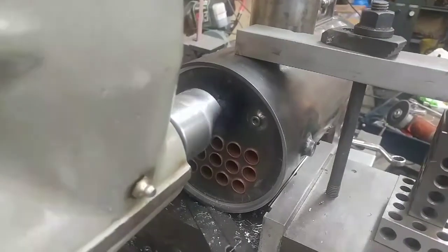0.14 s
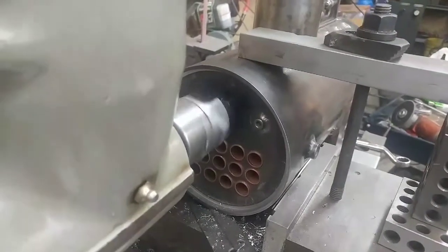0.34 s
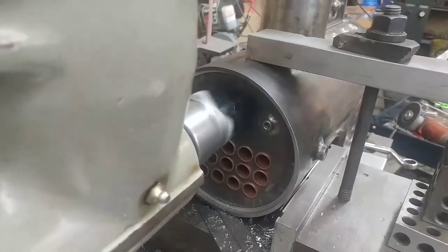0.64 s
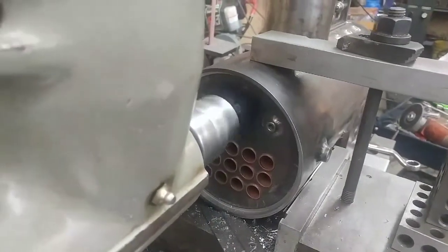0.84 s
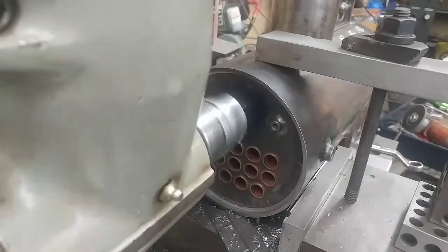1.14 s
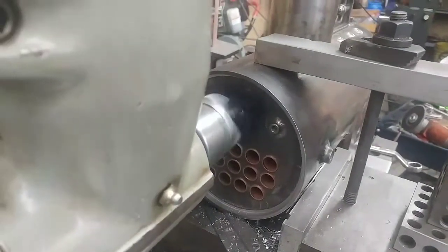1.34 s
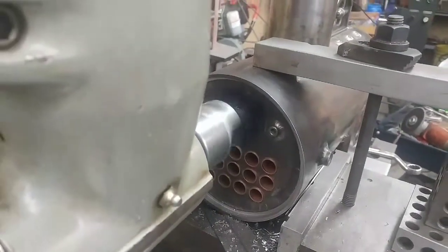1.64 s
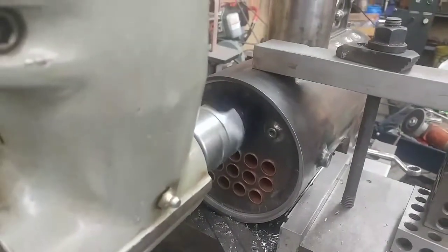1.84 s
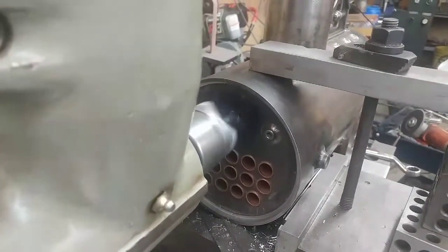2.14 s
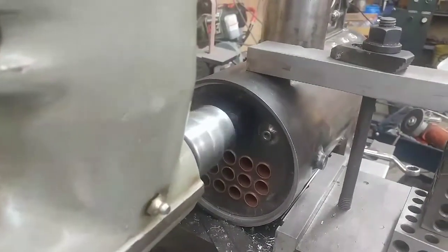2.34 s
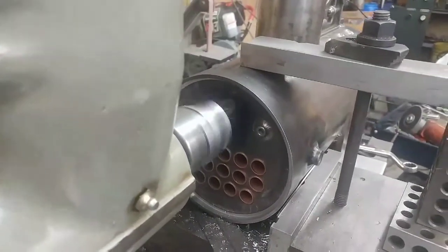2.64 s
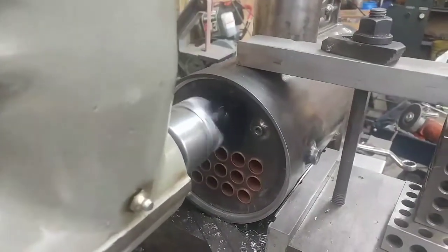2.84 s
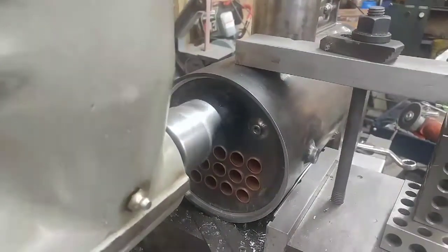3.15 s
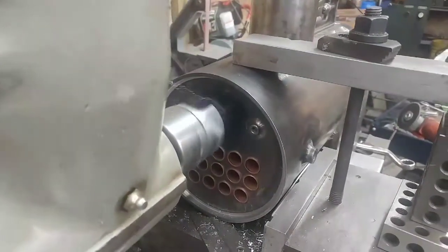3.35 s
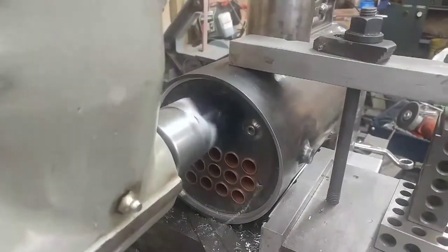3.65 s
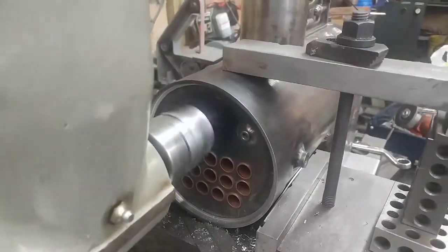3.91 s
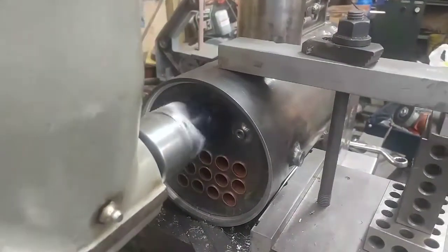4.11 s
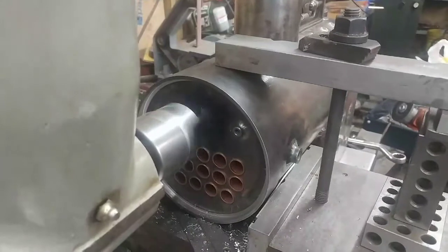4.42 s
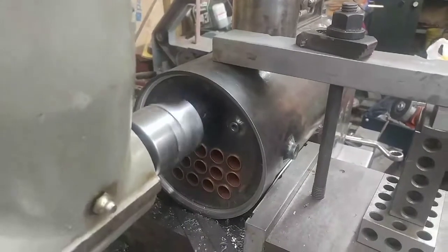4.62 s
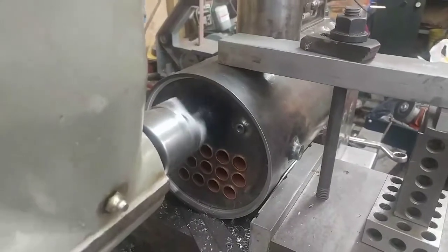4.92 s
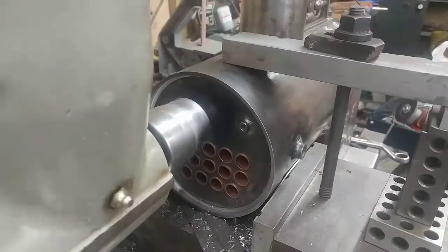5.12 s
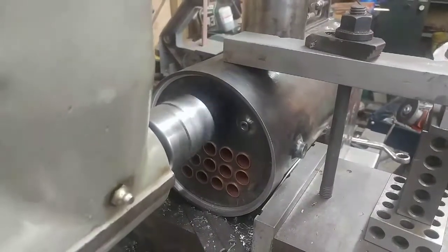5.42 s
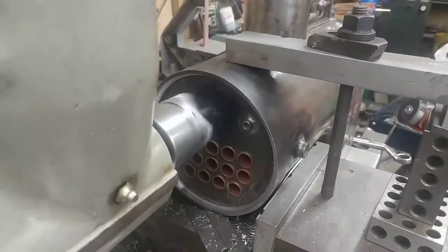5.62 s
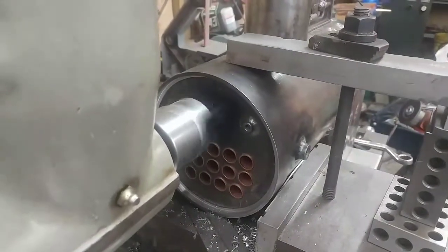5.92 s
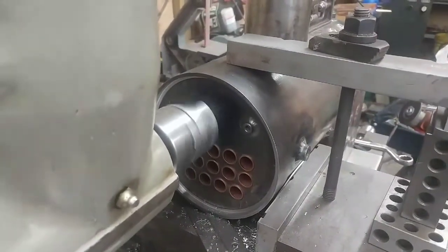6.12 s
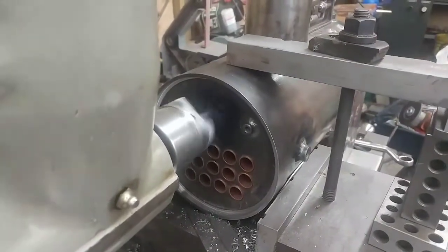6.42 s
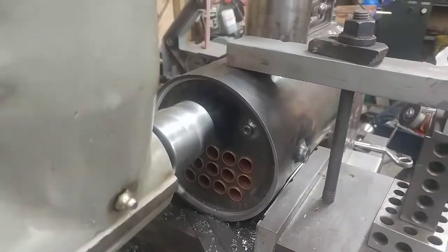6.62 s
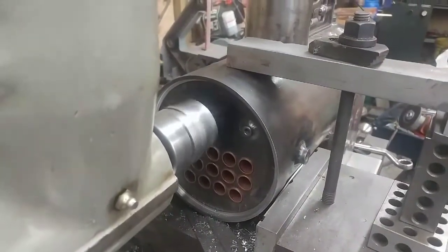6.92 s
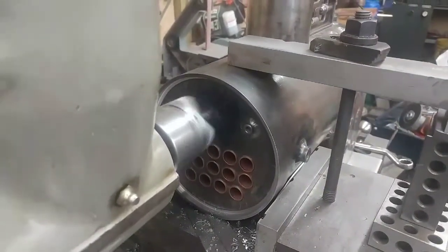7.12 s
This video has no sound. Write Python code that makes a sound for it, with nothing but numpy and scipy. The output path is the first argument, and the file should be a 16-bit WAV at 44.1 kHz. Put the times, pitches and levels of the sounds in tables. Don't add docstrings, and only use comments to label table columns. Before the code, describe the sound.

Close, continuous machine drone with a strong mid-pitched gear whine, overlaid by fluttering metallic scraping, thin squeals and bright chip hiss.

```python
import sys
import numpy as np
from scipy import signal
from scipy.fft import rfft, irfft, next_fast_len
from scipy.io import wavfile

SR = 44100
rng = np.random.default_rng(int(sys.argv[2]) if len(sys.argv) > 2 else 0)


def log_audio(samples):
    frames = np.atleast_2d(samples).T
    limited = np.clip(frames, -1, 1)
    pcm = np.round(limited * 32767).astype(np.int16)
    wavfile.write(sys.argv[1], SR, pcm)


def boost_factor(decibels):
    exponent = np.asarray(decibels, float) / 20
    return 10 ** exponent


N = 320166
T = np.arange(N) / SR
SIZE = next_fast_len(N)
HZ = np.maximum(np.arange(SIZE // 2 + 1) * SR / SIZE, 1)
SPINDLE_HZ, MOTOR_HZ = 8.6665, 23.92


def in_time(rows):
    start_s, *columns = np.transpose(rows)
    curves = [np.interp(T, start_s, column) for column in columns]
    return [curve - 10 * np.log10(np.mean(boost_factor(curve) ** 2)) for curve in curves]


def drift(rate_hz):
    pole = np.exp(-80 * np.pi * rate_hz / SR)
    noise = rng.standard_normal(N // 40 + 4002)
    slow = signal.lfilter([1], [1, -2 * pole, pole * pole], noise)[4000:]
    return np.interp(np.arange(N) / 40, np.arange(len(slow)), slow / slow.std())


def coloured(drive, power):
    return irfft(rfft(drive, SIZE) * np.sqrt(power * SR / 2), SIZE)[:N]


def resonance(pitch_hz, width_hz, level_db):
    detuning = (HZ ** 2 - pitch_hz ** 2) / (HZ * width_hz)
    return boost_factor(level_db) ** 2 / (1 + detuning ** 2) ** 2


def resonances(modes):
    return sum(resonance(*mode) for mode in modes)


def slope(points):
    pitch_hz, level_db = np.transpose(points)
    return boost_factor(np.interp(np.log(HZ), np.log(pitch_hz), level_db)) ** 2


def tones(table, gain_db, waver_db, wander_rad):
    out = np.zeros(N)
    for pitch_hz, level_db in table:
        phase = 2 * np.pi * (pitch_hz * T + rng.random()) + wander_rad * drift(0.51)
        level = boost_factor(level_db + gain_db + waver_db * drift(1.0))
        out += np.sqrt(2) * level * np.sin(phase)
    return out


def repeating(shaft_hz):
    pattern = rng.standard_normal(int(SR / shaft_hz) + 1)
    turn = T * shaft_hz % 1
    return pattern[(turn * (len(pattern) - 1)).astype(int)]


def rattle(repeat_share):
    same = (repeating(SPINDLE_HZ) + repeating(MOTOR_HZ / 2)) / np.sqrt(2)
    fresh = rng.standard_normal(N)
    return np.sqrt(1 - repeat_share) * fresh + np.sqrt(repeat_share) * same


# start_s, bite depth level_db, push of the bar on the work level_db
HAND_FEED = [(0, -41, -37.5), (.55, -40.5, -40.5), (.9, -38.5, -36), (1.55, -39, -35.5),
             (2.05, -36.5, -34.5), (2.4, -36, -36), (2.75, -38, -35.5), (3.2, -33, -38), (3.7, -39, -36),
             (4.1, -30.5, -37.5), (4.3, -31.5, -41), (4.55, -37.5, -41), (5.0, -40, -41.5),
             (5.3, -36, -38.5), (5.95, -35.5, -37.5), (6.2, -34, -37), (6.8, -32.5, -37),
             (7.26, -35, -37.5)]


def hand_feed():
    return in_time(HAND_FEED)


# pitch_hz, level_db (rms)
SPINDLE_WHINE = [(242.7, -69.0), (268.7, -61.7), (277.3, -47.7), (312.0, -57.5), (424.6, -51.7),
                 (450.7, -50.2), (520.0, -39.9), (528.7, -47.2), (546.0, -37.9), (554.6, -43.1),
                 (563.3, -45.7), (589.3, -57.0), (658.6, -47.3), (693.4, -48.4), (719.7, -44.8),
                 (832.0, -42.5), (840.6, -46.8), (849.3, -49.2), (1109.3, -54.1), (1117.9, -59.8),
                 (1282.7, -62.9), (1352.1, -68.3), (1378.4, -66.4), (1404.2, -57.5), (1412.1, -64.1),
                 (1421.3, -64.7)]
# pitch_hz, width_hz, level_db (per Hz)
CAST_HEAD = [(136, 64, -74.5), (293, 85, -70), (346.5, 56, -64), (422, 29, -80), (465.3, 44, -54.5),
             (539, 53, -50), (634, 41, -58), (720, 49, -53), (768, 54, -47), (824, 40, -48.5),
             (875, 31, -51), (1178, 136, -68.5), (1432, 36, -67), (1543, 35, -70.5), (1700, 220, -69),
             (2026, 330, -67.5), (2330, 73, -70)]


def lower_casting():
    push_db = hand_feed()[1]
    sound = coloured(rattle(0.25), resonances(CAST_HEAD[:7]))
    sound += tones(SPINDLE_WHINE, gain_db=1.0, waver_db=0.0, wander_rad=0.16)
    return boost_factor(0.4 * push_db) * sound


# pitch_hz, level_db (rms)
DRIVE_WHINE = [(63.5, -74.2), (103.1, -71.5), (119.9, -63.3), (141.5, -64.7), (150.2, -57.7),
               (184.5, -71.0), (212.3, -70.7), (240.0, -68.7), (254.2, -68.9), (283.0, -53.9),
               (288.8, -61.0), (297.5, -64.0), (329.7, -55.5), (359.9, -59.2), (475.3, -48.9),
               (531.5, -38.4), (543.1, -45.3), (566.2, -41.9), (600.8, -57.5), (647.1, -56.9),
               (739.3, -49.1), (768.6, -42.5), (778.6, -28.2), (820.4, -43.0), (837.3, -41.1),
               (843.5, -46.7), (861.3, -51.5), (878.2, -54.2), (898.5, -52.3), (940.5, -61.6)]
# pitch_hz, width_hz, level_db (per Hz)
SHAFT_RINGS = [(462, 5, -52), (768.5, 5, -45), (821, 6, -47), (837.8, 4, -44), (861.5, 4, -57),
               (1121, 4, -61), (1145, 4, -61), (1388, 4, -66), (1404, 4, -62), (1545.8, 4, -59),
               (1569, 5, -54), (1686.8, 4, -64), (1852.5, 4, -61), (1971, 3, -57), (1994.5, 4, -59),
               (2034.3, 2, -58), (2039, 5, -61), (2238, 8, -66), (2599.5, 3, -68), (2980, 3, -71),
               (3171, 3, -72), (4295, 5, -61)]
# start_s, level_db
DRIVE_STRAIN = [(0, -24), (.3, -27.5), (.9, -24), (1.4, -24), (1.6, -25.5), (1.9, -24), (2.45, -23),
                (2.75, -25.5), (3.2, -26.5), (3.5, -24.5), (3.9, -28), (4.2, -24.5), (4.5, -25),
                (5.1, -25.5), (5.35, -23.5), (5.8, -27), (6.2, -24.5), (7.26, -25)]


def upper_casting():
    strain_db = in_time(DRIVE_STRAIN)[0]
    sound = boost_factor(-1.4) * coloured(rattle(0.14), resonances(CAST_HEAD[7:11]))
    sound += coloured(rng.standard_normal(N), resonances(SHAFT_RINGS[:5]))
    sound += tones(DRIVE_WHINE, gain_db=-0.3, waver_db=0.6, wander_rad=0.3)
    return boost_factor(1.47 * strain_db) * sound


# pitch_hz, level_db (rms)
MESH_WHINE = [(1018.5, -54.4), (1121.1, -58.4), (1145.4, -56.5), (1184.7, -52.2), (1388.1, -58.2),
              (1483.8, -61.5), (1519.7, -59.4), (1531.7, -59.0), (1545.8, -56.4), (1569.7, -55.0),
              (1603.5, -57.9), (1627.4, -60.0), (1639.4, -57.9), (1651.3, -57.5), (1665.2, -58.7),
              (1686.2, -60.4), (1854.8, -56.7), (1946.7, -59.3), (1969.0, -52.5), (1974.4, -54.0),
              (1998.4, -56.1), (2010.2, -59.0), (2022.3, -50.8), (2165.9, -59.7), (2620.6, -64.2),
              (2635.5, -64.8), (2883.9, -62.7), (3206.9, -67.7), (4295.7, -54.4), (4319.8, -57.3)]
# pitch_hz, width_hz, level_db (per Hz)
HEAD_COVERS = [(2680, 160, -75), (2933, 200, -74), (3540, 120, -71.5)]


def tooth_mesh():
    belt_hz, belt_db, tight_s = 1.12, 1.14, 0.83
    mesh_db = belt_db * np.cos(2 * np.pi * belt_hz * (T - tight_s))
    sound = boost_factor(-1.2) * coloured(rattle(0.31), resonances(CAST_HEAD[11:] + HEAD_COVERS))
    sound += coloured(rng.standard_normal(N), resonances(SHAFT_RINGS[5:]))
    sound += tones(MESH_WHINE, gain_db=-1.0, waver_db=3.5, wander_rad=0.49)
    return boost_factor(mesh_db) * sound


# pitch_hz, level_db (per Hz)
RUNNING_NOISE = [(25, -100), (60, -83), (200, -78.5), (400, -95), (700, -61.5), (1300, -70.5),
                 (2400, -73.5), (3200, -88.5), (6000, -110)]


def rumble():
    return coloured(rattle(0.15), slope(RUNNING_NOISE))


# bites_per_turn, level_db, peak_turns
CHIP_LOAD = [(3, 0.6, .08), (4, 0.6, 0.088)]


def chip_load():
    load_db = 1.0 * drift(58)
    for bites, level_db, peak_turns in CHIP_LOAD:
        load_db = load_db + level_db * np.cos(2 * np.pi * bites * (SPINDLE_HZ * T - peak_turns))
    return load_db


def rings(modes, level_db, flicker_db, rate_hz):
    out = np.zeros(N)
    for mode in modes:
        level = boost_factor(level_db + flicker_db * drift(rate_hz))
        out += level * coloured(rng.standard_normal(N), resonance(*mode))
    return out


# pitch_hz, width_hz, level_db (per Hz)
BORING_BAR = [(4044, 270, -59), (4355, 1140, -64), (4764, 180, -65.5), (5400, 180, -70)]


def bar_ring(bite_db, push_db, load_db):
    lowest = rings(BORING_BAR[:1], 1.4 * bite_db + 0.29 * load_db, flicker_db=1.8, rate_hz=41)
    others = rings(BORING_BAR[1:], 0.78 * push_db + 0.18 * load_db, flicker_db=0.85, rate_hz=17)
    return boost_factor(-4.0) * lowest + boost_factor(-1.33) * others


def squeal(pitch_hz, warble_hz, level_db, follow_db, burst_db, rate_hz):
    slide = 0.8 * drift(rate_hz) + 0.6 * np.sin(2 * np.pi * (SPINDLE_HZ * T + rng.random()))
    phase = 2 * np.pi * np.cumsum(pitch_hz + warble_hz * slide) / SR
    bursts = boost_factor(burst_db * np.clip(drift(1.8 * rate_hz), -3, 1.2))
    bursts = bursts / np.sqrt(np.mean(bursts ** 2))
    return np.sqrt(2) * boost_factor(level_db + follow_db) * bursts * np.sin(phase)


# pitch_hz, warble_hz, level_db (rms)
BAR_SQUEALS = [
    (4040, 35, -42),
    (4775, 80, -45),
    (4430, 110, -48),
]


def bar_squeals(bite_db, push_db, load_db):
    low, high, middle = BAR_SQUEALS
    out = squeal(*low, 1.1 * bite_db + 1.5 * load_db, burst_db=4.0, rate_hz=20)
    out += squeal(*high, 1.3 * push_db + 2.4 * load_db, burst_db=5.0, rate_hz=13)
    out += squeal(*middle, push_db + 2.0 * load_db, burst_db=6.0, rate_hz=14)
    return out


# pitch_hz, width_hz, level_db (per Hz)
VESSEL_SHELL = [(5185, 50, -75), (5880, 25, -71), (6135, 40, -72), (6230, 60, -77), (6450, 30, -76),
                (6510, 25, -76), (6930, 40, -71), (7275, 70, -68), (7425, 80, -73), (7625, 55, -72),
                (7800, 40, -77), (7915, 70, -72), (7995, 30, -75), (8150, 35, -77)]


def shell_ring(shell_db, load_db):
    return boost_factor(1.0) * rings(VESSEL_SHELL, 0.84 * shell_db + 0.3 * load_db, flicker_db=2.2, rate_hz=5.5)


# pitch_hz, level_db (per Hz)
SCRAPE_HISS = [(1500, -100), (3200, -81), (5200, -75), (6700, -77.5), (8000, -79.5), (9150, -90),
               (9800, -84), (14800, -96.5), (20000, -105)]


def scrape(shell_db, load_db):
    hiss = coloured(rng.standard_normal(N), slope(SCRAPE_HISS))
    return boost_factor(0.47 * shell_db + 0.47 * load_db) * hiss


# pitch_hz, width_hz, level_db (per Hz)
CHIP_HISS = [(10380, 2050, -84), (11060, 360, -88)]


def chips(shell_db, load_db):
    return rings(CHIP_HISS, 0.4 * shell_db + 0.1 * load_db, flicker_db=1.3, rate_hz=6)


# pitch_hz, one_sided_lobe_db, one_sided_turns, two_sided_lobe_db, two_sided_turns
BAR_BEAMS = [(3000, 0, .9, 0, .25), (3900, 1.3, .93, 2.0, .26), (4300, .2, .04, .6, .35),
             (4800, .9, .53, 1.6, .19), (5300, 1.5, .29, 2.1, .05), (6200, .6, .49, 1.1, .11),
             (7100, 1.2, .73, .6, .25), (8500, 0, .73, 0, .25)]


def beamed(sound):
    spectrum = rfft(sound, SIZE)
    angle = 2 * np.pi * SPINDLE_HZ * T
    centres_hz = [row[0] for row in BAR_BEAMS]
    out = np.zeros(N)
    for k, (_, one_db, one_turns, two_db, two_turns) in enumerate(BAR_BEAMS):
        region = np.interp(HZ, centres_hz, np.arange(len(BAR_BEAMS)) == k)
        swell_db = one_db * np.cos(angle - 2 * np.pi * one_turns)
        swell_db = swell_db + two_db * np.cos(2 * angle - 4 * np.pi * two_turns)
        out += boost_factor(1.15 * swell_db) * irfft(spectrum * region, SIZE)[:N]
    return out


def cutting():
    bite_db, push_db = hand_feed()
    load_db = chip_load()
    shell_db = 0.31 * bite_db + 0.22 * push_db
    swept = bar_ring(bite_db, push_db, load_db) + bar_squeals(bite_db, push_db, load_db)
    swept += shell_ring(shell_db, load_db) + scrape(shell_db, load_db)
    return beamed(swept) + chips(shell_db, load_db)


def scene():
    head = lower_casting() + upper_casting() + tooth_mesh() + rumble()
    return (head + cutting())[None]


def band_limit(x):
    return signal.sosfilt(signal.butter(12, 15000, fs=SR, output="sos"), x)


# pitch_hz, width_hz, level_db
MICROPHONE_DIP = (9150, 260, -7)


def record(dry):
    pitch_hz, width_hz, level_db = MICROPHONE_DIP
    dip_db = level_db * np.exp(-((HZ - pitch_hz) / width_hz) ** 2)
    heard = irfft(rfft(dry, SIZE) * boost_factor(dip_db), SIZE)[:, :N]
    return band_limit(heard)


dry = scene()
out = record(dry)
log_audio(out)
```